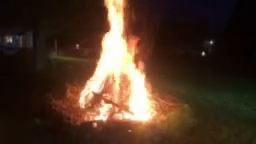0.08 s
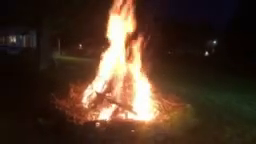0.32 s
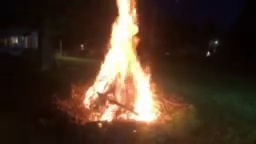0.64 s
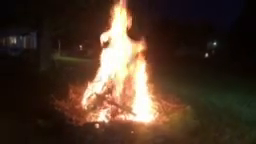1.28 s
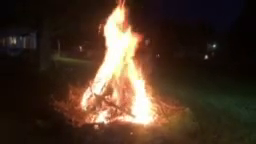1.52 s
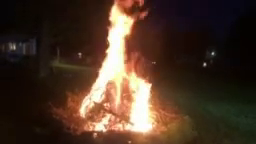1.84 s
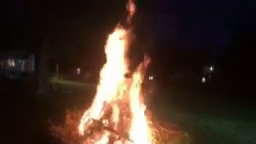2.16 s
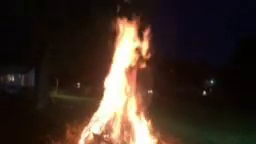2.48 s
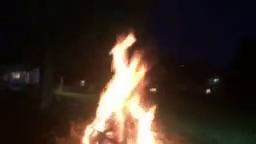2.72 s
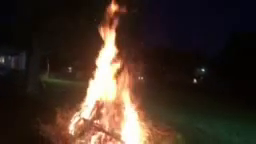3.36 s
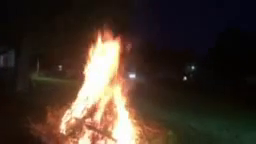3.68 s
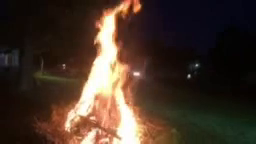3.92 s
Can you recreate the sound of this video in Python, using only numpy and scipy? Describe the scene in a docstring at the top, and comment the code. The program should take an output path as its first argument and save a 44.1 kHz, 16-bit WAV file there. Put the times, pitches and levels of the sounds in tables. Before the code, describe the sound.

A large bonfire burns outdoors a few metres away, its low roar rising quickly and holding under soft hiss and fine crackle. Sharp dry pops come at about 0.2 and 0.5 seconds, and the hiss drops after the second, louder one. More pops follow near 1.3, 2.1, 2.6, 3.1 and 3.5 seconds. A few dull knocks sound in the pile, mostly between 2.2 and 3 seconds.

```python
"""An open lawn, a large bonfire a few metres away. The flames roar low under a soft hiss and a midrange rush
whose levels drop after a loud pop half a second in. Steam pockets in the wood burst with dry pops a few
milliseconds long, fine crackle runs between them, and a few dull knocks come from deep in the pile."""
import sys
import numpy as np
from scipy import signal
from scipy.fft import rfft, irfft
from scipy.io import wavfile
from scipy.ndimage import uniform_filter1d

SR = 44100
rng = np.random.default_rng(int(sys.argv[2]) if len(sys.argv) > 2 else 0)


def master_out(mix):
    """Clip the mix to full scale and print it as 16-bit PCM to the path in sys.argv[1]."""
    frames = np.transpose(np.atleast_2d(mix))
    ceiling = np.clip(frames, -1, 1)
    pcm = np.round(ceiling * 32767).astype(np.int16)
    wavfile.write(sys.argv[1], SR, pcm)


N = 4 * SR


def undb(db):
    """Decibels to gain."""
    return 10 ** (np.asarray(db) / 20)


def unit(x):
    """Scale to an rms of one."""
    return x / np.sqrt(np.mean(x ** 2))


def colour(x, spectrum):
    """Minimum-phase filter through (Hz, dB) points, with unit power gain."""
    hz, db = np.array(spectrum, float).T
    bin_hz = np.maximum(np.arange(N // 2 + 1) * SR / N, 1)
    gain = unit(undb(np.interp(np.log(bin_hz), np.log(hz), db)))
    cepstrum = irfft(np.log(gain), N)
    cepstrum[1:N // 2] *= 2
    cepstrum[N // 2 + 1:] = 0
    return irfft(rfft(x) * np.exp(rfft(cepstrum)), N)


def shaped_noise(t, spectrum, levels):
    """Coloured noise whose rms follows (s, dB) points."""
    level_db = np.interp(t, *np.array(levels).T)
    return undb(level_db) * unit(colour(rng.standard_normal(N), spectrum))


def wander(rate_hz):
    """Random levels held 1 / rate_hz seconds and smoothed, with unit rms."""
    hold = int(SR / rate_hz)
    steps = np.repeat(rng.standard_normal(N // hold + 1), hold)
    return unit(uniform_filter1d(steps, hold)[:N])


# Flame spectra. Each row: frequency in Hz, relative density in dB.
RUMBLE_SPECTRUM = [(15, -57), (25, -29.5), (33, -10.5), (42, -3), (54, 0.5), (80, -1), (105, -6.5),
                   (130, -9), (160, -19), (240, -31.5), (400, -37.5), (800, -54.5), (3000, -87)]
TONGUE_SPECTRUM = [(60, -24), (130, -5.5), (180, 3.5), (240, -9.5), (340, -15), (600, -28), (3000, -64)]
# Flame envelopes. Each row: time in seconds, level in dB.
RUMBLE_ENVELOPE = [(0, -57.5), (.2, -50.5), (.35, -49.5), (.6, -49), (1.2, -50), (1.8, -50), (2.05, -51.5),
                   (2.6, -50), (3.3, -47.5), (4, -48)]
TONGUE_ENVELOPE = [(0, -60), (.5, -58.5), (.65, -65), (2.5, -63), (4, -67.5)]


def flames(t):
    """The column of flame rumbles and swells; its tongues rush above that, then ease."""
    rumble = shaped_noise(t, RUMBLE_SPECTRUM, RUMBLE_ENVELOPE)
    tongues = shaped_noise(t, TONGUE_SPECTRUM, TONGUE_ENVELOPE)
    return rumble + tongues


# Hiss spectrum. Each row: frequency in Hz, relative density in dB.
HISS_SPECTRUM = [(100, -2.5), (200, 11), (400, 3), (700, 2), (1300, -1), (1900, -7.5), (3000, -10),
                 (5000, -13.5), (6200, -13.5), (7500, -16), (9600, -15), (10500, -23), (12000, -19),
                 (13000, -46.5), (16000, -39)]
# Hiss envelope. Each row: time in seconds, level in dB.
HISS_ENVELOPE = [(0, -67), (.25, -66.5), (.54, -66.5), (.58, -70.5), (1.1, -70.5), (2, -70.5), (2.5, -70.5),
                 (2.8, -71), (4, -70.5)]


def hiss(t, flicker_hz=58.9, flicker_db=.5):
    """Gas and steam rush from the logs with a fine flicker."""
    flicker = undb(flicker_db * wander(flicker_hz))
    return flicker * shaped_noise(t, HISS_SPECTRUM, HISS_ENVELOPE)


# Midrange rush spectrum. Each row: frequency in Hz, relative density in dB.
MIDRANGE_SPECTRUM = [(250, -20), (700, 1.5), (1300, 0.5), (2000, -5), (3000, -16.5), (8000, -31)]
# Midrange rush envelope. Each row: time in seconds, level in dB.
MIDRANGE_ENVELOPE = [(0, -71), (.3, -73), (.53, -72), (.585, -87), (2.3, -93), (2.55, -74.5), (2.7, -90),
                     (4, -91.5)]


def midrange_rush(t):
    """A midrange rush, louder for the first half second, swelling briefly again near 2.5 s."""
    return shaped_noise(t, MIDRANGE_SPECTRUM, MIDRANGE_ENVELOPE)


def ring(age_s, hz, decay_cycles, attack_cycles=.2):
    """A damped cavity in the wood swells briefly, then falls by 1 / e every decay_cycles."""
    cycles = age_s * hz
    envelope = (1 - np.exp(-cycles / attack_cycles)) * np.exp(-cycles / decay_cycles)
    return np.sin(2 * np.pi * cycles) * envelope


# Spectrum of splintering wood. Each row: frequency in Hz, relative gain in dB.
SNAP_SPECTRUM = [(200, -2), (700, -3), (2200, 0), (2900, -7.5), (4000, -9.5), (5000, -10.5), (6000, -6),
                 (8500, -7), (11000, -7.5), (15000, -9.5)]


def steam_bursts(rows, size=1500):
    """Trapped steam snaps the wood and rings its cavity and splinters; the pile scatters a brief tail."""
    snap_decay_s = .00047
    scatter_db, scatter_decay_s = -7, .005
    echo_db, echo_decay_s = -6.5, .0023
    age_s = np.arange(size) / SR
    envelope = np.exp(-age_s / snap_decay_s) + undb(scatter_db) * np.exp(-age_s / scatter_decay_s)
    envelope_rms = np.sqrt(np.mean(envelope ** 2))
    bodies, snaps = np.zeros((2, N + size))
    for start_s, snap_db, cutoff_hz, rings in rows:
        span = int(start_s * SR) + np.arange(size)
        snap_noise, echo_noise = rng.standard_normal((2, size))
        body = sum(undb(db) * ring(age_s, hz, cycles) for hz, cycles, db in rings)
        pile_response = unit(echo_noise * np.sqrt(age_s) * np.exp(-age_s / echo_decay_s)) / np.sqrt(size)
        echoes = signal.fftconvolve(body, pile_response)[:size]
        bodies[span] += body + undb(echo_db) * echoes
        snap = undb(snap_db) * envelope_rms * unit(snap_noise * envelope)
        snaps[span] += signal.lfilter(*signal.butter(2, cutoff_hz, fs=SR), snap)
    return bodies[:N] + colour(snaps[:N], SNAP_SPECTRUM)


# Steam pockets. Each row: start in seconds, snap level in dB before filtering, snap cutoff in Hz, rings.
# Each ring: pitch in Hz, decay in cycles, gain in dB.
STEAM_POCKETS = [(.0026, -46.5, 19000, [(1510, .8, -51), (6940, 5, -55)]),
                 (.0578, -60, 9000, [(1520, .8, -50), (6150, 4.6, -59)]),
                 (.2211, -50, 14100, [(1160, 1.3, -46), (1780, 2.1, -42.5), (2300, 2.9, -40),
                 (3320, 1.6, -41), (5460, 4, -46)]), (.398, -61, 8000, [(2420, 1, -61), (6600, 5, -62)]),
                 (.461, -61.5, 11000, [(8950, 5, -65)]), (.5488, -50.5, 15000, [(930, .6, -48),
                 (1760, 1.3, -34.5), (2540, 3.6, -47), (5780, 11, -58), (8260, 4.2, -45.5)]),
                 (.5831, -58, 6000, [(3830, 2.4, -59)]), (.6325, -58, 4000, [(1320, 0.88, -54),
                 (3300, 2, -60)]), (.7921, -76, 4000, [(1590, 1.4, -53.5)]),
                 (1.075, -61, 7000, [(7500, 2, -59)]), (1.2116, -56, 4500, [(1100, 1.3, -49.5),
                 (2220, 3.7, -66), (3660, 4.5, -60)]), (1.2695, -54.5, 9200, [(1070, 1.1, -45.5),
                 (1400, 1.3, -43.5), (2250, 5.7, -58), (3110, 1.6, -52)]),
                 (1.695, -60, 8500, [(2300, 1.1, -61), (5100, 4.6, -75)]),
                 (2.0063, -65, 4000, [(1890, 0.86, -51)]), (2.1103, -54.5, 9800, [(1100, 1.8, -51),
                 (4160, 1.8, -45), (5600, 2.9, -53)]), (2.175, -60, 7500, [(6040, 3, -67)]),
                 (2.3116, -63, 4000, [(1490, 1.2, -58), (2250, 5, -66)]),
                 (2.3725, -56.5, 5000, [(1430, 3.6, -56.5), (2200, 2.6, -56.5)]),
                 (2.6012, -56.5, 8400, [(900, 0.75, -40.5), (1450, 2.2, -43.5), (1900, 4.2, -62),
                 (4400, 1.8, -48)]), (2.6384, -62, 4500, [(1400, 1, -60), (3400, 2.5, -62)]),
                 (2.6978, -65, 4000, [(2590, 1.5, -61)]), (2.8760, -56, 6030, [(880, 3.5, -54.5),
                 (2440, 0.91, -63), (4140, 1.7, -51)]), (3.0699, -56.5, 11000, [(1120, 0.73, -45),
                 (2280, 3, -57), (3350, 0.96, -45), (6010, 7.8, -56.5)]),
                 (3.0985, -60.5, 3500, [(1300, .6, -55), (2560, 2, -54.5)]),
                 (3.1772, -55, 5900, [(1190, .7, -51), (4200, 4.5, -69)]),
                 (3.460, -62, 7000, [(1800, 1.4, -56)]), (3.5026, -58.5, 8000, [(1360, 0.61, -45),
                 (2350, 1.7, -51), (3230, 1.6, -49)]), (3.7445, -56.5, 4470, [(1200, 0.76, -48),
                 (2250, 3, -60)]), (3.9165, -57, 7250, [(1000, 1.6, -55.5), (3230, 3.5, -57.5)])]


def pops():
    """The larger pockets in the wood burst one by one."""
    return steam_bursts(STEAM_POCKETS)


def crackle(rate_per_s=45, centre_hz=1460, range_octaves=5.2):
    """Tiny steam bursts at random moments, most of them faint."""
    snap_db, ring_db, spread_db = -80, -78, 4
    cutoff_hz, decay_cycles = 4860, 1
    rows = []
    for when, pitch, rank in rng.random((int(rate_per_s * N / SR), 3)):
        boost_db = -spread_db * np.log(max(rank, .04))
        hz = centre_hz * 2 ** (range_octaves * (pitch - .5))
        rings = [(hz, decay_cycles, ring_db + boost_db)]
        rows.append((when * N / SR, snap_db + boost_db, cutoff_hz, rings))
    return steam_bursts(rows)


# Knocks in the pile. Each row: start in seconds, pitch in Hz, decay in cycles, gain in dB.
PILE_KNOCKS = [(1.329, 523, 3.1, -55), (2.2469, 576, 0.71, -48), (2.4205, 686, 0.29, -41.5),
               (2.4308, 540, 1.1, -51.5), (2.6085, 655, 0.22, -39), (2.6335, 696, .6, -49.5),
               (3.026, 595, 0.41, -45.5)]


def knocks(size=1500):
    """Muffled bursts deep in the pile ring without any snap."""
    track = np.zeros(N)
    age_s = np.arange(size) / SR
    for start_s, hz, decay_cycles, db in PILE_KNOCKS:
        first = int(start_s * SR)
        track[first:first + size] += undb(db) * ring(age_s, hz, decay_cycles)
    return track


def scene():
    """The bonfire in open air, mono."""
    t = np.arange(N) / SR
    return (flames(t) + hiss(t) + midrange_rush(t) + pops() + crackle() + knocks())[None]


def record(dry):
    """Steep low-pass at 15 kHz."""
    return signal.sosfilt(signal.ellip(8, .2, 70, 15000, fs=SR, output="sos"), dry)


dry = scene()
out = record(dry)
master_out(out)
```